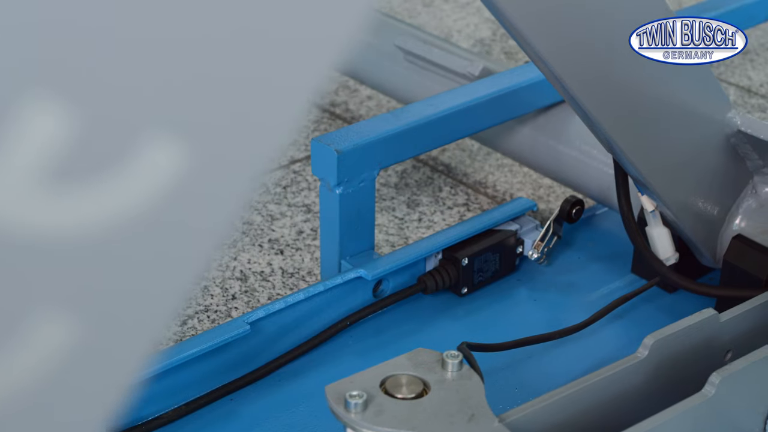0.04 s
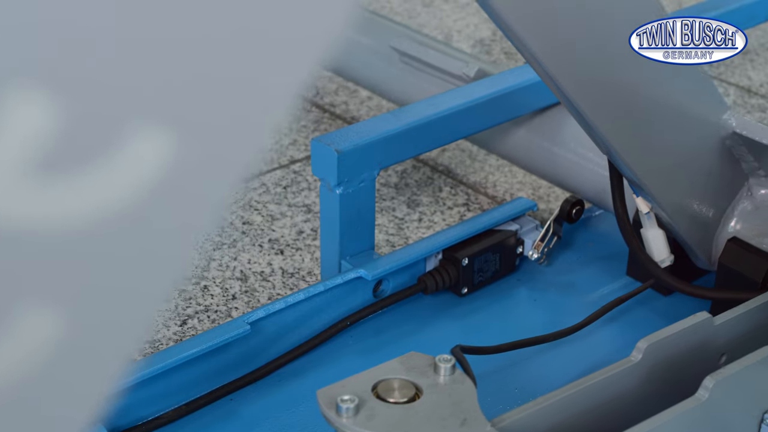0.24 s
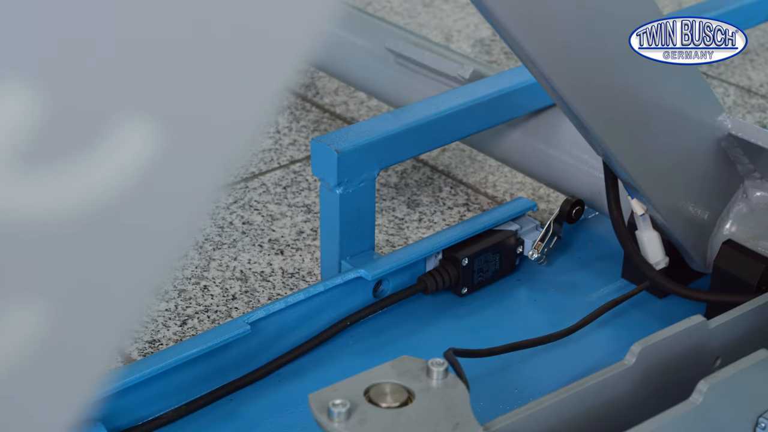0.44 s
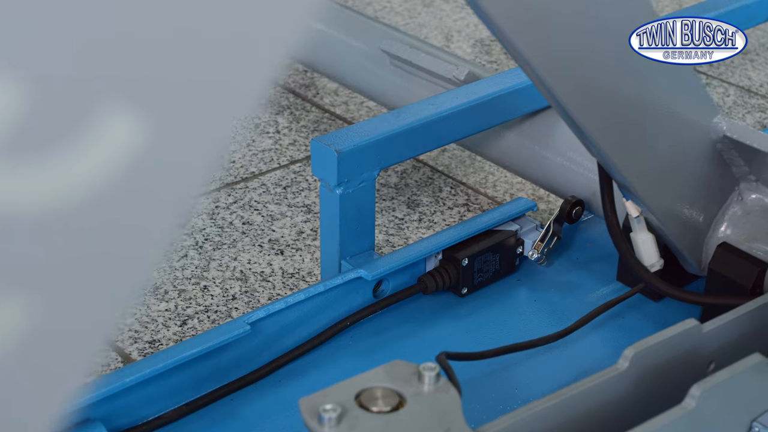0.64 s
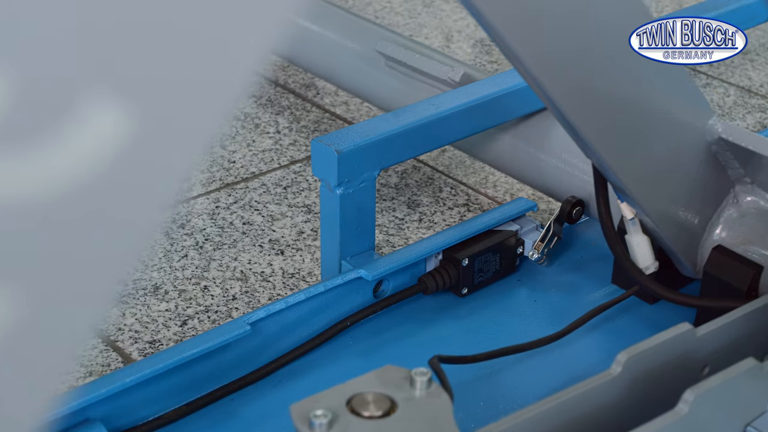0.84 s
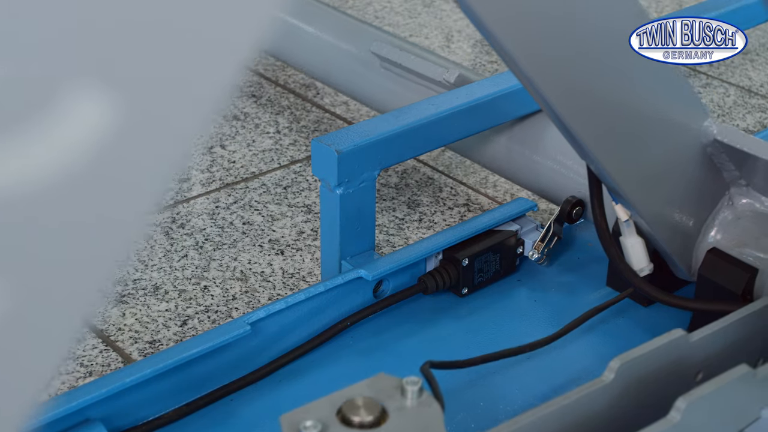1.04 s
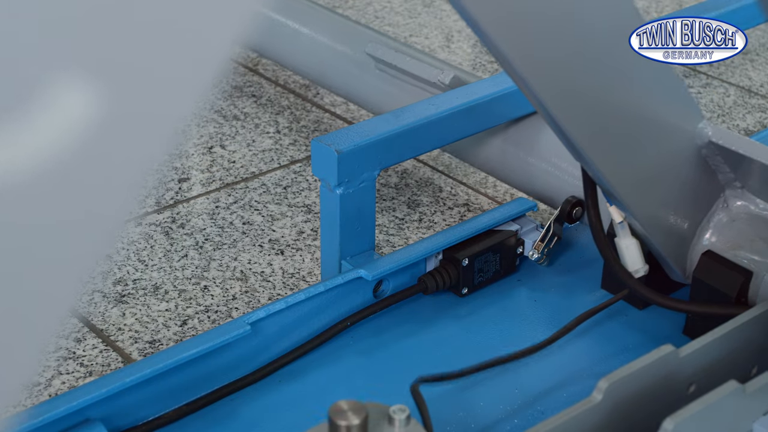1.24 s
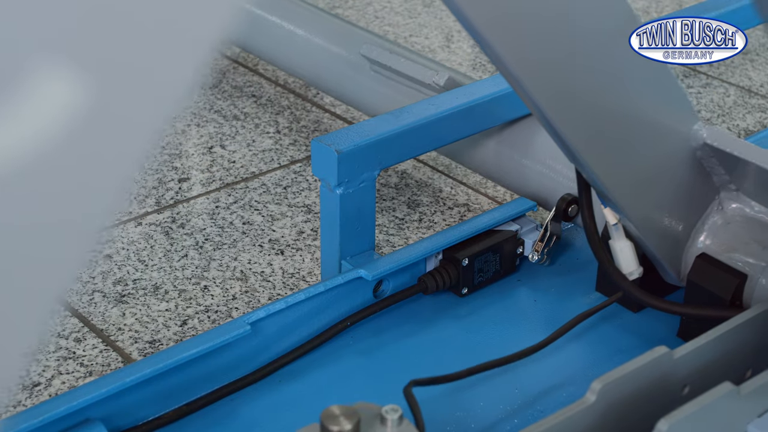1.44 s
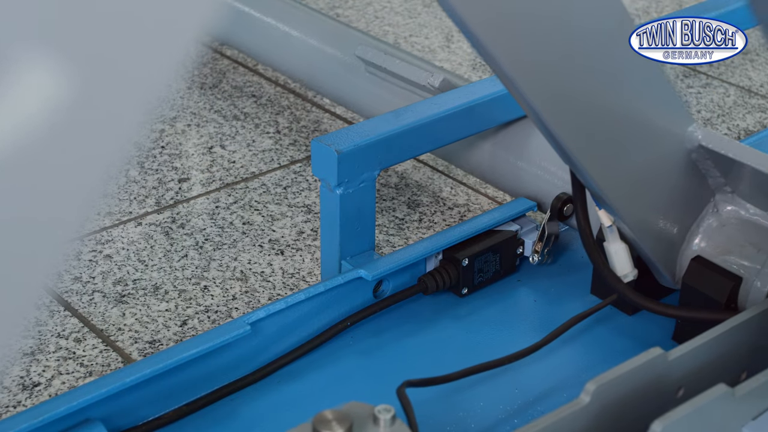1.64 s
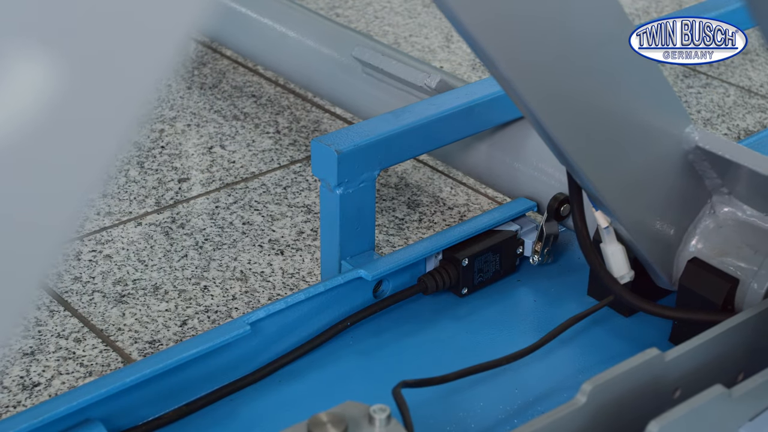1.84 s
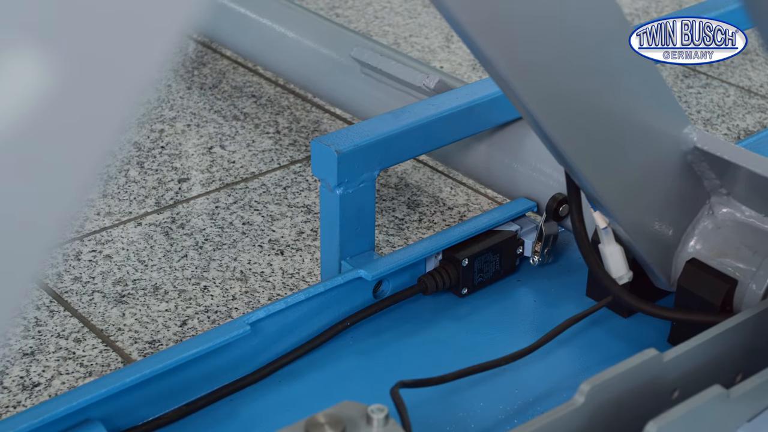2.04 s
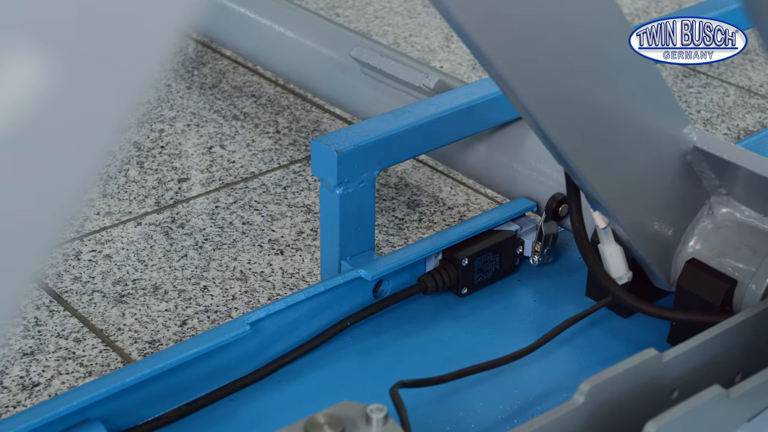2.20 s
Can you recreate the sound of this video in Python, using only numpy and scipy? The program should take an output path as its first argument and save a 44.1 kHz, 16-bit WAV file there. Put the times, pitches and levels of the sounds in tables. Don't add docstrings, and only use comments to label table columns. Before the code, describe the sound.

An electric hydraulic lift pump hums and whines, then stops with two loud metallic clacks

```python
import sys
import numpy as np
from scipy import signal
from scipy.fft import rfft, irfft
from scipy.io import wavfile
from scipy.ndimage import uniform_filter1d

SR = 44100
rng = np.random.default_rng(int(sys.argv[2]) if len(sys.argv) > 2 else 0)


def to_wav(sig):
    pcm = np.clip(np.atleast_2d(sig), -1, 1) * 32767
    pcm = np.round(pcm).astype(np.int16)
    wavfile.write(sys.argv[1], SR, pcm.T)


def undo_db(level):
    steps = np.asarray(level, float) / 20
    return 10 ** steps


N = 100062
T = np.arange(N) / SR
SHAFT_HZ, MAINS_HZ = 49.779, 50.0
STOP_S, RUNDOWN_S = 1.27, 0.035
TAIL_T60_S = 1.73
CLUSTER_SPREAD, CLUSTER_HZ = 0.014, 14


def unit(x):
    return x / np.sqrt(np.mean(x ** 2) + 1e-20)


def at_hz(points, hz):
    p = np.array(points)
    return np.interp(np.log(hz), np.log(p[:, 0]), p[:, 1])


def colour(x, spectrum):
    hz = np.arange(len(x) // 2 + 1) * SR / len(x) + 1
    return irfft(rfft(x) * undo_db(at_hz(spectrum, hz)), len(x))


def filtered(x, order, hz, kind="low"):
    return signal.sosfilt(signal.butter(order, hz, kind, fs=SR, output="sos"), x)


def drift(rate):
    knots = np.arange(int(N / SR * 40) + 3)
    return np.interp(T * np.clip(rate, 1, 39), knots, rng.standard_normal(len(knots))) * 1.2


def ring(x, hz, t60):
    radius, turn = undo_db(-60 / (t60 * SR)), 2 * np.pi * hz / SR
    return signal.lfilter([0, np.sin(turn)], [1, -2 * radius * np.cos(turn), radius * radius], x + 1e-18)


def cracks(rows):
    out = 0
    for start, db, length in rows:
        age = np.maximum(T - start, 0)
        out = out + undo_db(db - 5) * (1 - np.exp(-age / 0.00014)) * np.exp(-age / length)
    return out


def blows(rows, spectrum, modes, ring_db, spread=1, signs=(-1, 1)):
    shudder_s = 0.018
    noise = unit(colour(rng.standard_normal(N), spectrum))
    out = noise * cracks([row for row in rows if row[2] < shudder_s])
    out = out + filtered(noise, 1, 9000) * cracks([row for row in rows if row[2] >= shudder_s])

    at = [int(row[0] * SR) for row in rows]
    levels_db = np.array(rows)[:, 1]
    snap = np.zeros(N)
    snap[at] = undo_db(levels_db - 17)
    out += filtered(snap, 1, [2500, 14000], "band")

    strike = undo_db(levels_db.max() + ring_db) * (np.arange(N) == at[np.argmax(levels_db)])
    for hz, level_db, t60 in modes:
        half_width_hz = (CLUSTER_SPREAD * hz + CLUSTER_HZ) * spread
        for off in np.linspace(-1, 1, 6) + rng.uniform(-0.2, 0.2, 6):
            height = undo_db(level_db - 11 - 2.0 * off ** 2) * rng.choice(signs)
            out += height * ring(strike, hz + half_width_hz * off, t60)
    return out


# frequency in Hz, t60 in seconds.
HALL_DECAY = [(100, 9.6), (400, 2.9), (1200, 1.57), (2800, 1.96), (6000, 1.22), (12000, 0.76),
              (16000, 0.34)]


def hall(x):
    edges = 40 * 2 ** np.arange(0, 9.1, 0.5)
    tail = 0
    for low, high in zip(edges, edges[1:]):
        band = filtered(rng.standard_normal(N), 2, [low, high], "band")
        tail = tail + band * undo_db(-60 * T / at_hz(HALL_DECAY, np.sqrt(low * high)))
    tail = tail * np.clip((T - 0.006) / 0.0084, 0, 1)
    return signal.fftconvolve(x, [tail / np.sqrt(np.sum(tail ** 2))], axes=1)


# frequency in Hz, level in dB per Hz.
MURMUR_COLOUR = [(15, -36), (25, -13), (60, -2.5), (161, -1), (317, -3.5), (700, -16), (1840, -34),
                 (2700, -14.5), (4030, -34), (16000, -41)]


def low_murmur():
    sink_db = 30 * np.maximum(T - 1.9, 0)
    return undo_db(-48.5 - sink_db) * unit(colour(rng.standard_normal(N), MURMUR_COLOUR))


# centre in seconds, level in dB, pitch in Hz, length in seconds.
FLOOR_BUMPS = [
    (1.254, -42, 52, .05),
    (1.748, -54, 60.7, .04),
    (1.962, -45, 56, 0.036),
    (2.01, -46, 57, .04),
    (2.225, -55, 44.7, 0.076),
]


def bumps():
    out = 0
    for centre, db, hz, length in FLOOR_BUMPS:
        out = out + undo_db(db) * np.exp(-((T - centre) / length) ** 2 * 4) * np.sin(2 * np.pi * hz * T)
    return out


# start in seconds, peak in dB, length in seconds.
CABLE_RUSTLES = [
    (.23, -48, 0.009),
    (.242, -58, 0.01),
    (1.582, -43, 0.013),
    (1.597, -47, 0.0097),
]
# start in seconds, peak in dB, pitch in Hz, t60 in seconds.
METAL_TICKS = [
    (1.238, -40, 7600, .02),
    (1.2557, -17, 1519, 0.014),
    (1.583, -42, 6850, 0.02),
    (1.919, -54, 8000, 0.017),
    (1.92, -54, 4100, 0.022),
    (1.946, -39, 3400, 0.011),
    (1.947, -57, 6900, 0.0083),
    (1.955, -33, 1020, 0.016),
    (1.958, -37, 800, .016),
    (1.958, -56, 7920, 0.011),
]


def ticks():
    out = cracks(CABLE_RUSTLES) * filtered(rng.standard_normal(N), 1, [7000, 14000], "band")
    for start, db, hz, t60 in METAL_TICKS:
        touch = signal.lfilter(np.hanning(90) / 45, 1, np.arange(N) == int(start * SR))
        out += undo_db(db) * ring(touch * 2 * np.sin(2 * np.pi * hz * T), hz, t60)
    return out


# start in seconds, peak in dB, crack length in seconds.
LATCH_TOUCHES = [
    (2.0545, -44, 0.01),
    (2.0592, -23.5, 0.0078),
    (2.064, -30, 0.055),
]
# frequency in Hz, level in dB per Hz.
LATCH_CRACK = [(150, -34), (491, -15), (950, -20), (1270, -4), (1650, -13), (3130, -5), (4000, -15),
               (11000, -14), (16000, -24)]
# frequency in Hz, level in dB, t60 in seconds.
LATCH_RINGS = [(410, -8, .3), (476, -4, .5), (560, -6, .5), (715, -11, .6), (1276, -1, .35), (1337, -6, .5),
               (1410, -4, .4), (2536, -13, .3), (2885, -10, .55), (3090, 2, .15), (3219, 0, .45),
               (3400, -7, .5), (7150, -14, .15), (10800, -20, .2)]


def latch():
    return blows(LATCH_TOUCHES, LATCH_CRACK, LATCH_RINGS, -7.5, spread=0.7, signs=(-1, 1, 1, 1))


# start in seconds, peak in dB, crack length in seconds.
FIRST_CLACK = [
    (1.2590, -5.5, 0.0035),
    (1.2645, -15, 0.004),
    (1.268, -21, 0.03),
    (1.275, -28, .06),
]
# start in seconds, peak in dB, crack length in seconds.
SECOND_CLACK = [
    (1.3366, -6, 0.004),
    (1.3395, -11, .004),
    (1.343, -12, 0.005),
    (1.347, -24, 0.045),
    (1.361, -28, 0.021),
    (1.4075, -30, .004),
]
# frequency in Hz, level in dB per Hz.
FIRST_CRACK = [(180, -51), (300, -3), (1780, -1), (2070, 1), (3190, -5), (3580, -6.5), (5700, -10),
               (6300, -17), (16000, -35)]
SECOND_CRACK = [(100, -43), (350, -10), (749, -3.5), (2140, -2), (2360, -4), (3400, -3), (3890, -12),
                (5610, -11), (16000, -35.5)]
# frequency in Hz, level in dB, t60 in seconds.
CONTACTOR_RINGS = [(234.6, -2.5, 0.9), (322.8, -4, 1.08), (687, 2, 0.22), (885, 0.5, 0.2), (1248, -3, 0.24),
                   (1624, -2.5, 0.65), (2120, 3, 0.18), (2360, 2, 0.1), (2590, -5.5, 1.9), (3420, -6, 1.25),
                   (4100, -15, 0.88), (6800, -9, 0.28), (12700, -19, 0.22)]


def contactor():
    first = blows(FIRST_CLACK, FIRST_CRACK, CONTACTOR_RINGS, -23.5)
    second = blows(SECOND_CLACK, SECOND_CRACK, CONTACTOR_RINGS[:-2], -28)
    return first + second


# frequency in Hz, level in dB, t60 in seconds.
PLATE_RINGS = [(4398, -8, .35), (4667, -14, .5), (5640, -15, .75), (6853, -14, .4), (7246, -20, .5),
               (8274, -12, .25), (8950, -22, .45), (10340, -17, .2), (11590, -26, .4), (13700, -20, .08)]


def plate():
    strike = undo_db(-34) * (np.arange(N) == int(SECOND_CLACK[0][0] * SR))
    out = 0
    for hz, db, t60 in PLATE_RINGS:
        for off in np.linspace(-1, 1, 5) + rng.uniform(-0.2, 0.2, 5):
            detuned_hz = hz * (1 + CLUSTER_SPREAD * 1.1 * off)
            out = out + undo_db(db) * rng.choice([-1, 1]) * ring(strike, detuned_hz, t60)
    return out


# frequency in Hz, level in dB per Hz.
RUSH_COLOUR = [(60, -21), (160, -15), (350, -7.5), (750, -1.5), (1500, -12.5), (3600, -20), (7000, -27.5),
               (16000, -40)]
# frequency in Hz, width in Hz, level in dB.
BODY_RESONANCES = [(485, 106, -9), (1210, 320, -3), (1730, 120, -11.5), (2550, 1260, -4), (4090, 140, -27),
                   (5330, 870, -19.5), (7000, 250, -33)]


def oil_rush(swing_db, running):
    white = rng.standard_normal(N) * (1 + 0.15 * np.sin(4 * np.pi * MAINS_HZ * T))
    rush = unit(colour(white, RUSH_COLOUR))
    for hz, width_hz, db in BODY_RESONANCES:
        body = unit(ring(rng.standard_normal(N), hz, 3.1 / width_hz))
        rush = rush + undo_db(db + 0.8 * drift(12)) * body
    return unit(rush) * undo_db(-44 + swing_db) * running


# time in seconds, level in dB.
HUM_LEVEL = [(0.0, -33), (0.04, -33.5), (0.8, -33.5), (0.9, -36.5), (1.265, -35), (1.3, -45), (1.43, -53),
             (1.52, -43), (1.67, -43.5), (1.72, -51), (1.87, -57), (1.96, -54), (1.99, -54), (2.27, -71)]


def hum(swing_db, running, after):
    stopped = 1 - running
    phase = 0.6 + 1.05 * np.clip((T - 0.82) / (1.0 - 0.82), 0, 1) + stopped * drift(16) / 5
    level_db = np.interp(T, *np.transpose(HUM_LEVEL)) + stopped * 1.2 * drift(12)
    main = undo_db(level_db) * np.sqrt(2) * np.sin(4 * np.pi * MAINS_HZ * T + phase)

    left = running ** 2 + stopped * undo_db(-30 - 60 * after / TAIL_T60_S + 3.9 * drift(11.6))
    octave = np.sqrt(2) * np.sin(8 * np.pi * MAINS_HZ * T + 1.1 - 0.9 * T)
    return main + left * undo_db(-40.5 + 0.67 * swing_db) * octave


def tones(base_hz, rows, swing_db):
    out = 0
    for multiple, db, share in rows:
        level = undo_db(db + share * swing_db + 1.3 * drift(6.05))
        out = out + level * np.sqrt(2) * np.sin(2 * np.pi * (base_hz * multiple * T + rng.random()))
    return out


# multiple, level in dB at light load, share of the load swing.
SHAFT_WHINE = [(9, -52, 1.2), (20, -55, 1.8), (22, -52, 0.1), (23, -57, 0.5), (24, -57, 1.3),
               (25, -51, 0.8), (26, -62, 2.0), (36, -75, 1.7), (44, -61, 0.0), (45, -57, 0.1),
               (49, -63, 0.8), (51, -67, 1.7), (52, -66, 2.0), (53, -60, 2.0), (54, -60, 0.0),
               (56, -63, 2.0), (57, -65, 1.7), (58, -59, 0.9), (61, -73, 2.0), (62, -61, 1.2),
               (81, -61.5, 0.8), (90, -59.5, 1.0), (92, -73, 1.4), (100, -72, 0.0), (110, -70, 1.0),
               (114, -82, 0.3), (118, -86, 2.0)]
# multiple, level in dB at light load, share of the load swing.
MAINS_BUZZ = [(5, -57, 0.2), (6, -55, 0.0), (8, -63, 2.0), (10, -49, 0.7), (12, -55, 0.0), (16, -59, 0.0),
              (18, -56, 0.5)]


def whine(swing_db, running, after):
    loaded = (T > 1.03) & (T < 1.25)
    tone_swing_db = swing_db * 7 / np.mean(swing_db[loaded])
    orders = np.setdiff1d(np.arange(11, 170), np.array(SHAFT_WHINE)[:, 0])
    comb_db = at_hz(RUSH_COLOUR, orders * SHAFT_HZ) - 59 + 3.5 * rng.standard_normal(len(orders))
    lines = tones(SHAFT_HZ, SHAFT_WHINE, tone_swing_db) + tones(MAINS_HZ, MAINS_BUZZ, tone_swing_db)
    lines = lines + tones(SHAFT_HZ, zip(orders, comb_db, np.ones(len(orders))), swing_db)
    return lines * (running + (1 - running) * undo_db(-1 - 60 * after / TAIL_T60_S))


# time in seconds, level in dB.
PUMP_LOAD = [
    (0.05, -39),
    (0.058, -39.5),
    (0.556, -39),
    (0.722, -40.5),
    (1.12, -33),
    (1.24, -34),
]


def pump():
    load_db = np.interp(T, *np.transpose(PUMP_LOAD))
    swing_db = load_db - np.mean(load_db[T < 0.8])
    after = np.maximum(T - STOP_S, 0)
    running = np.exp(-after / RUNDOWN_S)
    lines = whine(swing_db, running, after) + hum(swing_db, running, after)
    return lines, oil_rush(swing_db, running)


def scene():
    lines, rush = pump()
    clack = contactor() + plate()
    latching, small = latch(), ticks()
    rush_sent = undo_db(-4) * rush
    sent = undo_db(-11.5) * clack + undo_db(-13.5) * latching + undo_db(-7) * small + rush_sent
    before = rush_sent[SR // 2:0:-1]
    wet = hall([np.concatenate([before, sent])])[:, len(before):len(before) + N]
    return wet + lines + rush + clack + latching + small + bumps() + low_murmur()


def roll_off(x):
    return signal.sosfilt(signal.butter(12, 16480, fs=SR, output="sos"), x)


def record(dry):
    top = 0.36
    x = filtered(dry, 2, 30, "high")
    loud = uniform_filter1d(np.abs(x), size=9, axis=1) * 1.4 + 1e-9
    x = x * top * np.tanh(loud / top) / loud
    mix = signal.sosfilt(signal.cheby2(20, 50, 16000, fs=SR, output="sos"), x)
    return roll_off(mix)


dry = scene()
out = record(dry)
to_wav(out)
```